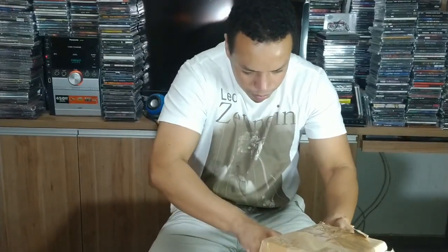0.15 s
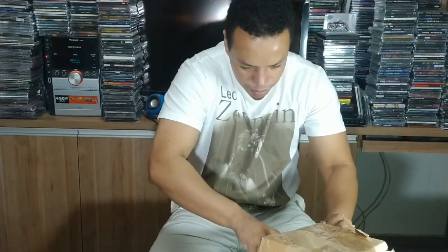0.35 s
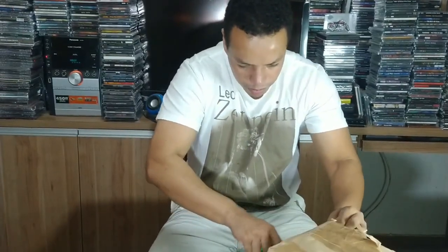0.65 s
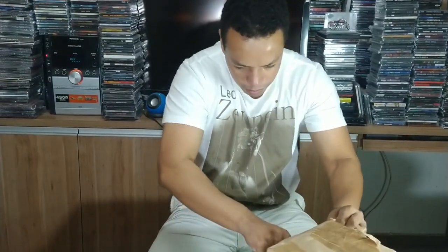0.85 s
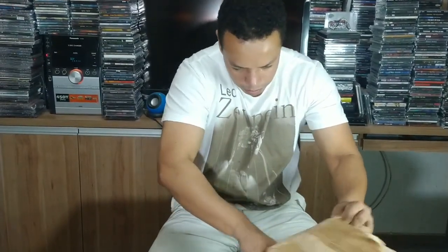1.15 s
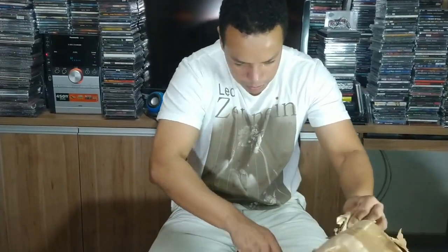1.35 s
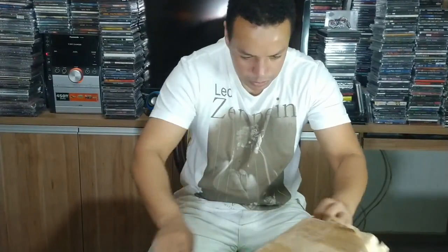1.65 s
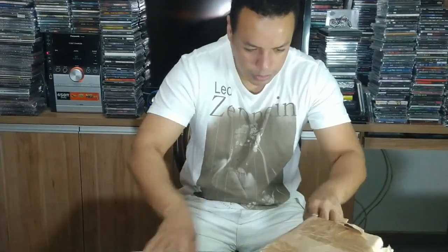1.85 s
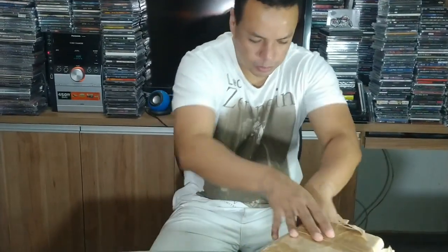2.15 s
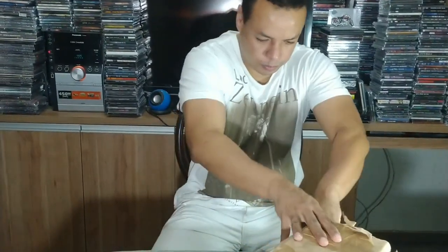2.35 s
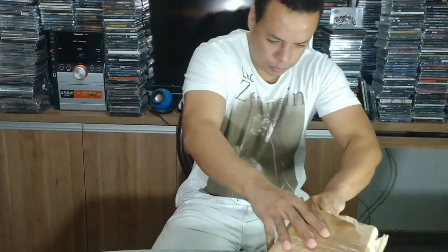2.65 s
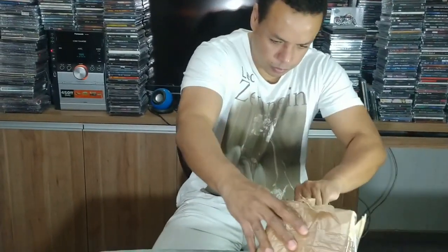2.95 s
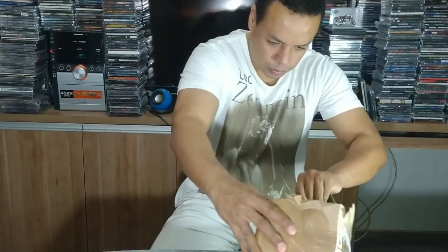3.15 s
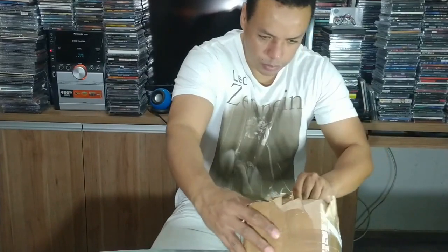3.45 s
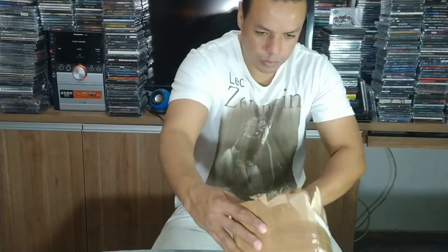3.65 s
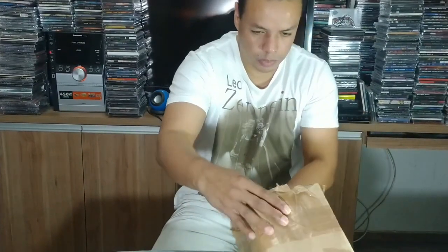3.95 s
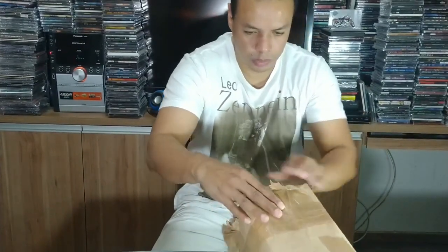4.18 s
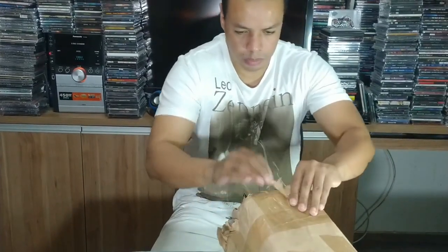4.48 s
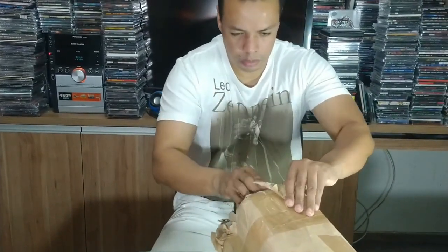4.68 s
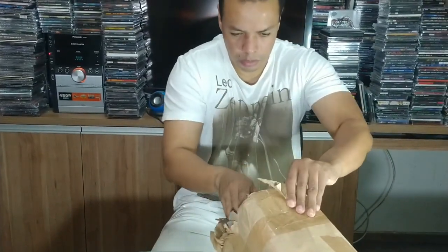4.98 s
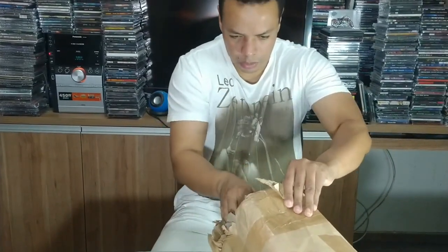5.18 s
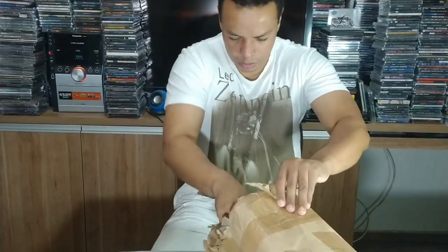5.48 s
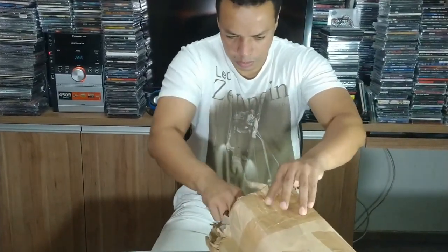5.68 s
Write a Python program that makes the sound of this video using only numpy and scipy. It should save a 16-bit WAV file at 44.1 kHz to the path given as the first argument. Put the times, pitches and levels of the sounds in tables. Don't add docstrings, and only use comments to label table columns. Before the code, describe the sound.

A parcel is unwrapped by hand in a small shelved room. Bright dry ticks, a snapping jerk, then a low carton thud with a crunch. After a lull comes dense tearing and popping, then delicate rustling with fingertip taps, finally a rising crumple. Low hum and light hiss sit underneath; the stereo image is wide.

```python
import sys
import numpy as np
from scipy import signal
from scipy.fft import rfft, irfft, next_fast_len
from scipy.io import wavfile
from scipy.ndimage import map_coordinates

SR = 44100
rng = np.random.default_rng(int(sys.argv[2]) if len(sys.argv) > 2 else 0)


def bounce(signal):
    frames = np.transpose(np.atleast_2d(signal))
    limited = np.clip(frames, -1, 1)
    pcm = np.round(limited * 32767).astype(np.int16)
    wavfile.write(sys.argv[1], SR, pcm)


def voltage_ratio(level):
    return 10 ** (np.asarray(level, float) / 20)


N = 256641
TOP_HZ = 15200


def unit(x):
    return x / np.sqrt(np.mean(x ** 2) + 1e-20)


def along(points, hz):
    f, v = np.transpose(points)
    return np.interp(np.log(hz + 1), np.log(f + 1), v)


def wobble(rate_hz):
    knots = rng.standard_normal(int(N * rate_hz / SR) + 4)
    return map_coordinates(knots, [np.arange(N) * rate_hz / SR])


def filtered(x, response):
    m = next_fast_len(N + 4096)
    return irfft(rfft(x, m) * response(np.fft.rfftfreq(m, 1 / SR)), m)[..., :N]


def small(x, corner_hz):
    def radiation(f):
        q = 1j * f / corner_hz
        return (q ** 2 / (1 + 1.4 * q + q ** 2)) ** 2
    return filtered(x, radiation)


def grains(s, hz, cycles, gain, place, size):
    lead_s = 0.00026 * (place - .1)
    ports = []
    for start in (s + lead_s / 2, s - lead_s / 2):
        first = np.ceil(start * SR).astype(int)[:, None] + np.arange(size)
        turns = (first / SR - start[:, None]) * hz[:, None]
        decay = np.exp(-3 * turns / cycles)
        onset = 1 - np.exp(-2.5 * turns)
        wave = gain[:, None] * np.sin(2 * np.pi * turns) * decay * onset
        ports.append(np.bincount(np.clip(first, 0, N).ravel(), wave.ravel(), N + 1)[:N])
    return np.array(ports)


# frequency in Hz, level in dB rms.
MOTOR_ORDERS = [(57.2, -69), (114.5, -74.5), (171.7, -62.5), (178, -74.5), (240, -76), (286, -71.5),
                (858, -109), (972, -114)]


def motor_hum():
    t = np.arange(N) / SR - np.array([[0], [6e-4]])
    hum = 0
    for hz, db in MOTOR_ORDERS:
        level = voltage_ratio(db + 2 + 1.1 * wobble(9))
        hum = hum + level * np.sin(2 * np.pi * hz * t + 0.4 * wobble(13))
    return hum


# frequency in Hz, density in dB per Hz.
AIR = [(30, -23), (60, -3), (120, 1.5), (250, -4.5), (400, -6), (700, -4.5), (1200, -11), (2000, -17),
       (3500, -22.5), (5000, -26), (9000, -42), (15000, -29)]
# frequency in Hz, likeness (0-1).
ALIKE = [(60, 0.1), (500, 0.7), (1500, 0.05), (8000, .05)]


def room_tone():
    def mid_side(hz):
        angle = np.arccos(np.clip(along(ALIKE, hz), -1, 1)) / 2
        return voltage_ratio(along(AIR, hz)) * [np.cos(angle), np.sin(angle)]
    mid, side = filtered(rng.standard_normal((2, N)), mid_side)
    return voltage_ratio(-65.0 + 0.23 * wobble(1.8)) * unit(np.array([mid + side, mid - side]))


# frequency in Hz, t60 in seconds.
ROOM_T60 = [(200, 0.24), (1000, 0.19), (4000, 0.18), (14000, 0.22)]


def room(x):
    wet, step = np.zeros((2, N + SR)), SR // 3
    for i in range(0, N, step):
        hz, t, z = signal.stft(rng.standard_normal((2, SR // 2)), SR, nperseg=256)
        decay = voltage_ratio(-60 * t / along(ROOM_T60, hz)[:, None])
        tail = signal.istft(z * decay, SR, nperseg=256)[1]
        answer = signal.fftconvolve(x[:, i:i + step], tail / np.linalg.norm(tail[0]), axes=1)
        start = i + 260
        wet[:, start:start + answer.shape[1]] += answer[:, :wet.shape[1] - start]
    return wet[:, :N]


# start in seconds, level in dB, pitch in Hz.
BUMPS = [
    (0.658, -40.5, 280),
    (1.27, -40, 232),
    (1.289, -24.5, 250.5),
    (1.295, -32, 175),
    (1.315, -27.5, 252.5),
    (2.621, -39.5, 303),
    (5.799, -49, 370),
]
# start in seconds, level in dB, pitch in Hz.
TAPS = [
    (3.985, -51, 632),
    (3.99, -56, 1114),
    (4.83, -53.5, 1000),
    (4.937, -45, 870),
    (4.965, -47, 857),
]


def carton():
    sound = 0
    for events, cycles in ((BUMPS, 9.0), (TAPS, 33)):
        s, db, hz = np.transpose(events)
        sound = sound + grains(s, hz, cycles, voltage_ratio(db), np.full_like(s, .5), size=4096)
    return sound


# start in seconds, peak in dB, pitch in Hz.
POPS = [(0.719, -23.5, 1050), (0.736, -31, 746), (2.601, -30, 635), (2.6765, -11.5, 707),
        (2.719, -19.5, 832), (2.768, -19.5, 789), (2.968, -28.5, 1740), (2.978, -36.5, 825),
        (3.123, -36.5, 1250), (3.428, -21, 1150), (3.806, -42.5, 1698), (5.733, -10.5, 1800),
        (5.755, -20, 1160), (5.784, -24, 1250)]


def panel_pops():
    s, db, hz = np.transpose(POPS)
    return small(grains(s, hz, 3.54, voltage_ratio(db - 2.5), rng.random(len(s)), size=1024), 445)


# time in seconds, pitch in Hz.
PANEL = [(0, 1020), (1.4, 1324), (2.55, 800), (2.85, 900), (2.95, 1372), (3.02, 944), (3.1, 1410),
         (3.3, 1800), (3.4, 1550), (3.44, 1240), (3.75, 1103), (3.85, 1650), (3.95, 882), (5.4, 1047),
         (5.46, 1380), (5.7, 1354), (5.82, 910)]


def free_panel_hz(s):
    return np.interp(s, *np.transpose(PANEL))


# start in seconds, peak in dB, crack in Hz.
TICKS = [(.2668, -47, 10000), (.3122, -50, 10500), (.3267, -42, 10900), (0.3394, -30, 9800),
         (.56, -39, 10500), (0.54, -38.5, 10300), (0.6173, -36.5, 10400), (1.1862, -37.5, 9900),
         (1.8086, -44, 9990), (2.0884, -50, 11600), (2.291, -39.5, 9700), (2.5655, -23.5, 9500),
         (2.9012, -31, 11900), (3.1273, -18, 10200), (3.1792, -20, 8000), (3.6621, -44, 11000),
         (4.1852, -43, 5730), (4.2822, -36.5, 7500), (4.6708, -40.5, 9840), (4.6902, -41.5, 9320),
         (4.7732, -32, 7800), (4.9901, -34.5, 4900), (5.0883, -46.5, 4940), (5.1223, -38.5, 5260),
         (5.1356, -30, 5050), (5.1804, -34.5, 8440), (5.185, -32.5, 10300), (5.3214, -31, 5400)]
# start in seconds, peak in dB, panel in dB re peak, panel in Hz.
FOLDS = [(0.656, -25, -16, 800), (.663, -16.5, -21.5, 587), (.6933, -13.5, -3.5, 722),
         (1.0666, -56.5, 9, 1860), (1.2865, -24, -1.5, 873), (2.4877, -43.5, -13, 1320),
         (2.5286, -27.5, -18.5, 1190), (2.615, -20.5, -1.5, 726), (2.6196, -13.5, -9, 615),
         (2.6812, -13.5, -34, 720), (2.9065, -25, -19, 1470), (3.0606, -31, -23, 1420),
         (3.0677, -24, -14, 1310), (3.1866, -22.5, -6, 1350), (3.3663, -35, 2, 1830),
         (4.308, -41, -13.5, 730), (4.3125, -37, -16, 1520), (4.9331, -33, -4.5, 800),
         (4.9394, -38.5, -2.5, 870), (5.271, -31, -36, 859), (5.4557, -28, 1, 1448),
         (5.4799, -25, -6.5, 1370), (5.5809, -31, -1, 1690), (5.6262, -28.5, 4.5, 2050),
         (5.6602, -24, -10, 1340), (5.672, -23, -5, 1620), (5.6793, -22, -2, 1410),
         (5.7003, -15.5, -1.5, 1660), (5.7041, -26, -15, 1190), (5.757, -17, -18, 990)]


def folds():
    s, db, hz = np.transpose(TICKS)
    thin = [s, db, hz, np.full_like(s, -32.5), free_panel_hz(s)]
    s, db, panel_db, panel_hz = np.transpose(FOLDS)
    crack_hz = 2870 * np.exp(0.083 * (rng.random(len(s)) - .5))
    thick = [s, db, crack_hz, panel_db, panel_hz]
    return np.hstack([thin, thick])


def fold_crack(s, db, hz, place):
    crack = grains(s, np.full_like(s, 9000), 2.9, voltage_ratio(db + 1.5), place, size=32)
    crack = crack + grains(s, hz, 5.0, voltage_ratio(db + 2), place, size=256)
    for _ in range(4):
        late, shift = rng.random((2, len(s)))
        ring_hz = np.minimum(hz * np.exp(0.74 * (shift - .5)), TOP_HZ)
        crack = crack + grains(s + .004 * late, ring_hz, 7.2, voltage_ratio(db - 8.5 - late), place, size=256)
    return small(crack, 2700)


def fold_panel(s, db, hz, place):
    first = grains(s, hz, 5.26, voltage_ratio(db + 2.0), place, size=1024)
    late_s = 0.00198 * rng.random(len(s))
    second = grains(s + late_s, hz * 2.57, 1.5, voltage_ratio(db + 8.5), place, size=512)
    return small(first + second, 445)


def snaps():
    s, db, hz, panel_db, panel_hz = folds()
    place = rng.random(len(s))
    return fold_crack(s, db, hz, place) + fold_panel(s, db + panel_db, panel_hz, place)


def effort(gestures, focus_db, t):
    s, db, rise_s, fall_s, crease = np.transpose(gestures)[..., None]
    away = np.where(t < s, (s - t) / rise_s, (t - s) / fall_s)
    share = voltage_ratio(-2 * focus_db * (crease - np.arange(4)) ** 2)
    power = voltage_ratio(2 * (db - 20 * away ** 1.085))
    return share.T @ power


# peak time in seconds, peak in dB, rise in seconds, fall in seconds,
# crease size from 0 (fibre) to 3 (panel).
RUSTLES = [(0, -62, .1, 0.11, -0.44), (.33, -48, 0.07, 0.069, -0.29), (.37, -43.5, 0.041, 0.037, 1.33),
           (.5, -50, 0.11, 0.093, -0.26), (1.07, -54, 0.017, .1, 0.76), (1.15, -44.5, 0.067, 0.23, -0.0052),
           (1.812, -56, 0.0048, 0.062, -0.66), (2.092, -63, .008, .3, -0.88), (2.3, -52, 0.094, 0.2, 0.086),
           (2.5, -50.5, .07, 0.04, 0.013), (3.29, -42.5, .03, 0.17, 0.56), (3.75, -58, 0.9, 0.46, -0.15),
           (3.865, -36.5, 0.089, 0.056, 1.2), (4.0, -49.5, 0.6, 0.12, 0.97), (4.24, -46, 0.23, 0.028, 0.53),
           (4.312, -42.5, 0.0058, 0.067, 0.97), (4.46, -49.5, 0.22, 0.087, 0.35),
           (4.63, -53, 0.06, 0.021, 1.4), (4.8, -57.5, 0.076, 0.21, 0.52), (4.938, -44, 0.012, 0.08, 0.68),
           (5.14, -55, 0.02, 0.037, -0.62), (5.19, -62.5, 0.027, 0.12, 0.17),
           (5.28, -48, 0.049, 0.19, 0.61), (5.54, -53.5, 0.1, .1, -0.34)]
PULLS = [(.66, -41.5, 0.026, 0.037, 0.87), (.7, -25.5, 0.014, 0.022, 1.86), (.718, -36.5, .02, 0.09, 2.3),
         (1.295, -30.5, 0.026, 0.082, 1.82), (2.54, -52.5, 0.1, 0.054, 1.1), (2.58, -51, .05, 0.055, .1),
         (2.63, -27, 0.039, 0.019, 1.63), (2.687, -26, 0.046, 0.065, 1.2),
         (2.772, -31.5, 0.01, 0.074, 2.92), (2.907, -41.5, 0.0089, 0.56, 0.96), (3.0, -40, 0.19, 0.067, 1),
         (3.068, -36.5, 0.018, 0.062, 0.76), (3.128, -35.5, 0.026, 0.083, 1.9),
         (3.185, -33.5, 0.036, .12, 1.47), (3.385, -30.5, 0.035, 0.07, 0.96),
         (3.433, -28, 0.0065, 0.097, 1.05), (5.46, -38, 0.011, 0.023, 0.88),
         (5.49, -43.5, 0.043, 0.11, 2.08), (5.585, -37, .01, 0.26, 2.5), (5.665, -33, 0.011, .2, 2.5),
         (5.735, -28.5, 0.19, 0.23, 2.6), (5.82, -25.5, 0.035, 0.13, 2.2)]
# pitch in Hz (None: the free panel's), log spread of pitch, ring in cycles, rate per second.
CREASES = [
    (10400, 0.15, 7.6, 9700),
    (6340, 0.3, 6.3, 4000),
    (2765, 0.3, 3.9, 1500),
    (None, 0.26, 7.8, 450),
]


def crinkle():
    t = np.arange(0, N / SR, .002)
    levels = np.sqrt(effort(RUSTLES, 7, t) + effort(PULLS, 2.78, t))
    clumps = wobble(45)
    total = 0
    for (hz, spread, cycles, rate), shape, db in zip(CREASES, levels, [-2.5, -4.0, -4.0, -2.5]):
        count = int(rate * N / SR)
        moment, sign, place = rng.random((3, count))
        detune, strength = rng.standard_normal((2, count))
        s = moment * N / SR
        gain = voltage_ratio(4.5 * strength) * np.sign(detune * (sign - .5))
        centre_hz = hz or free_panel_hz(s)
        low_hz = np.min(centre_hz)
        pitch_hz = np.minimum(centre_hz * np.exp(spread * detune), TOP_HZ)
        swarm = grains(s, pitch_hz, cycles, gain, place, size=int(2 * cycles * SR / low_hz))
        swarm = small(swarm, 0.54 * low_hz)
        level = voltage_ratio(db) * np.interp(np.arange(N) / SR, t, shape)
        total = total + level * unit(swarm * voltage_ratio(2.0 * clumps + 2.95 * wobble(25)))
    return total


def scene():
    background = motor_hum() + room_tone()
    box = carton()
    cracks = snaps() + panel_pops()
    swarm = crinkle()
    wet = room(voltage_ratio(-2.5) * swarm + voltage_ratio(4.5) * cracks + voltage_ratio(-2.5) * box)
    near = voltage_ratio(-1) * swarm + voltage_ratio(4.0) * cracks + box
    return (near + wet) * voltage_ratio([[-.6], [.6]]) + background


# frequency in Hz, share of the other port taken off.
CROSSFEED = [(100, 0.13), (1000, 0.25), (2200, 0.62), (4400, 0.42), (6600, 0.37), (8000, 0.42),
             (15000, 0.11)]


def other_port(dry):
    delay_s = 20.5 / 44100
    return filtered(dry[::-1], lambda hz: along(CROSSFEED, hz) * np.exp(-2j * np.pi * hz * delay_s))


# frequency in Hz, level in dB.
SELF_NOISE = [(1000, -99), (2200, -70), (4400, -72), (8000, -74.5), (15000, -80.5)]


def amplifier_hiss(shape):
    return filtered(rng.standard_normal(shape), lambda hz: voltage_ratio(along(SELF_NOISE, hz)))


def band_limits(hz):
    top = voltage_ratio(-.05 * np.maximum(hz - TOP_HZ, 0))
    return top * hz ** 2 / (hz ** 2 + 45 ** 2)


def low_pass(x):
    return signal.sosfilt(signal.butter(12, 16260, fs=SR, output="sos"), x)


def record(dry):
    wide = dry - other_port(dry) + amplifier_hiss(dry.shape)
    mix = filtered(wide, band_limits)
    return low_pass(mix)


dry = scene()
out = record(dry)
bounce(out)
```